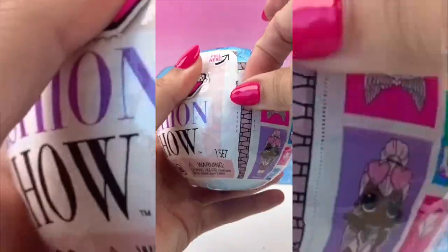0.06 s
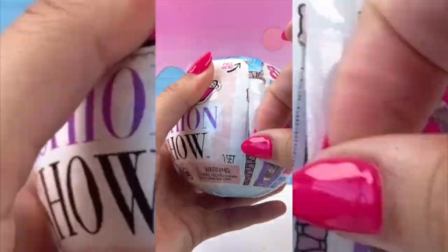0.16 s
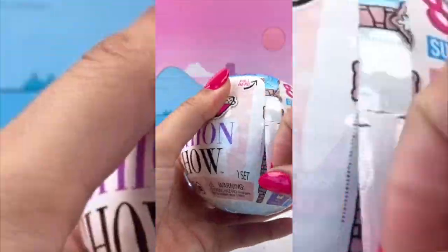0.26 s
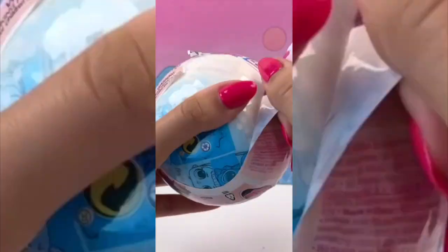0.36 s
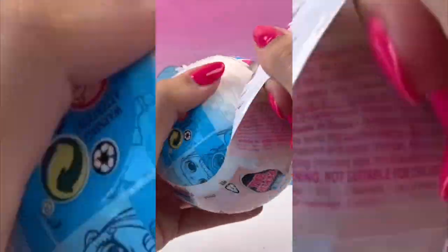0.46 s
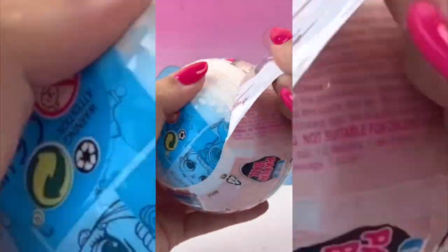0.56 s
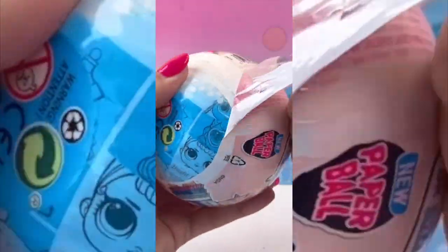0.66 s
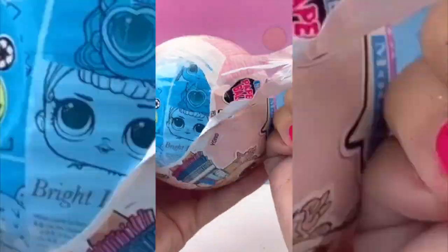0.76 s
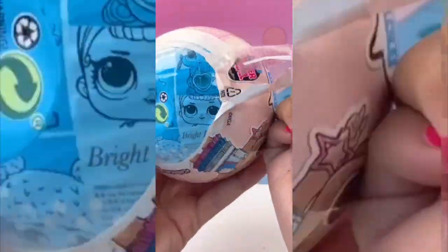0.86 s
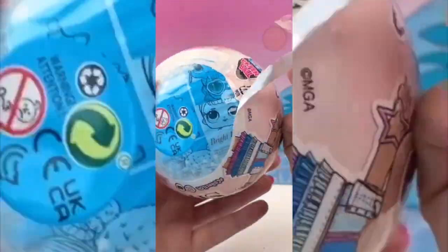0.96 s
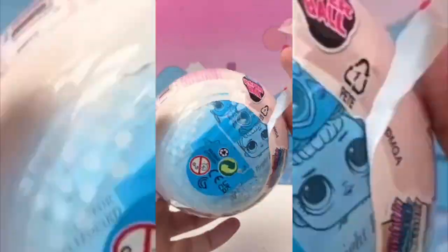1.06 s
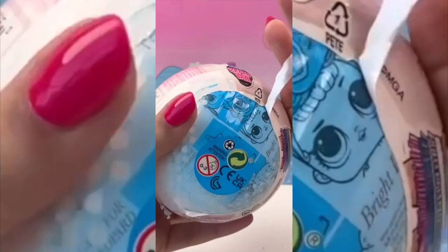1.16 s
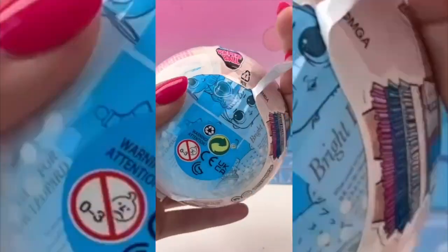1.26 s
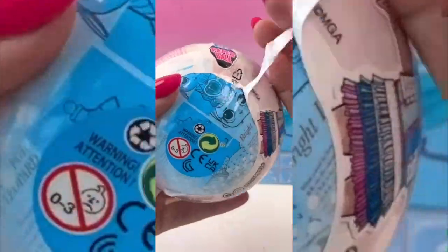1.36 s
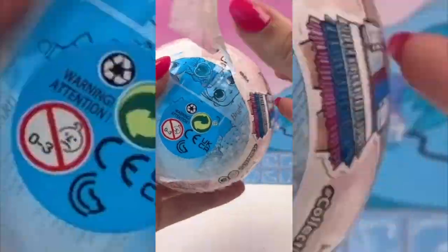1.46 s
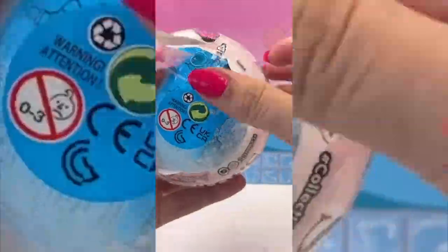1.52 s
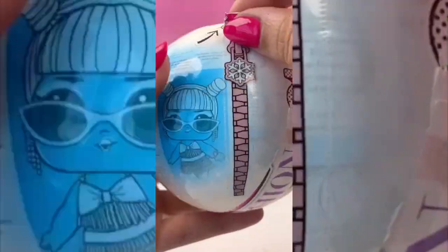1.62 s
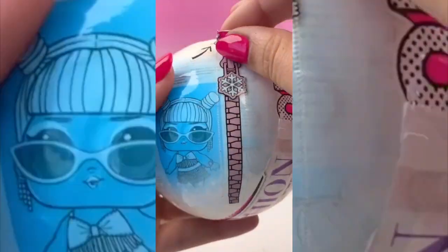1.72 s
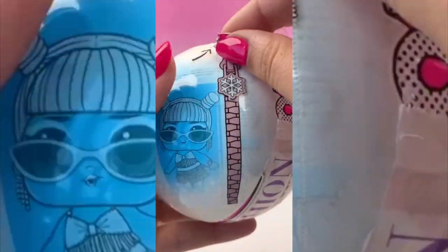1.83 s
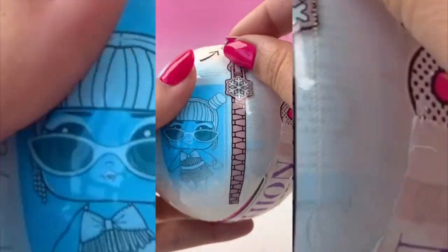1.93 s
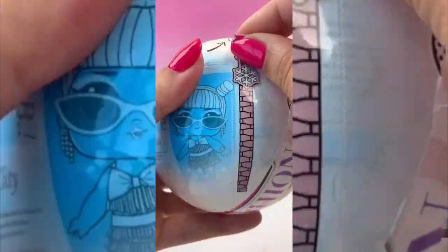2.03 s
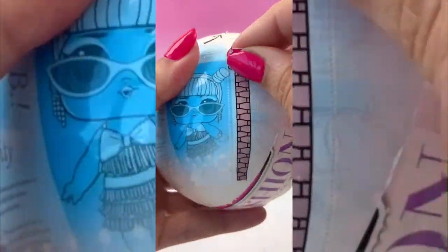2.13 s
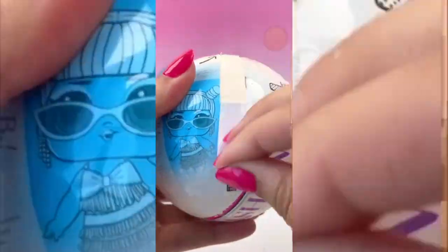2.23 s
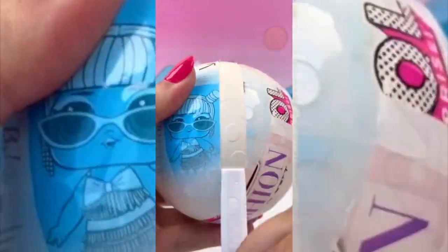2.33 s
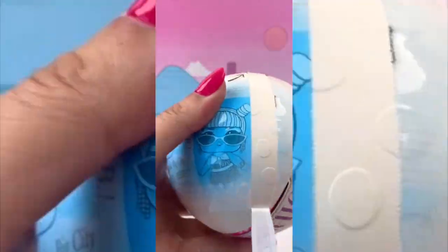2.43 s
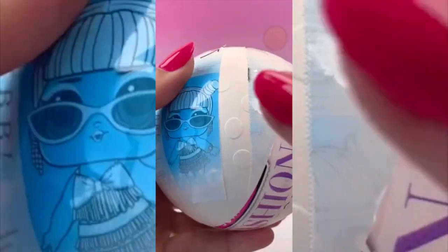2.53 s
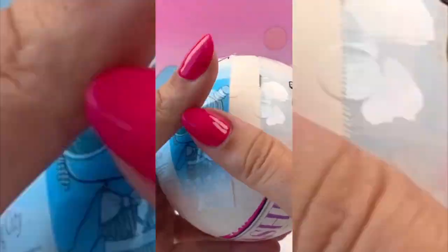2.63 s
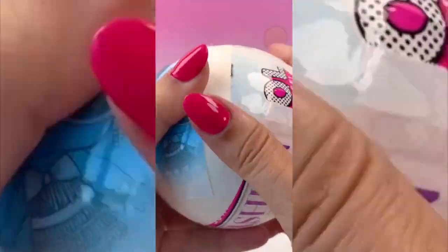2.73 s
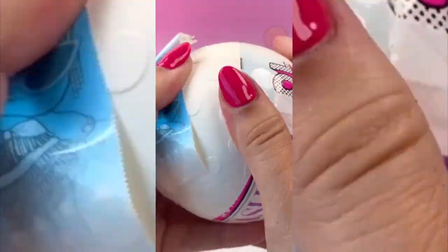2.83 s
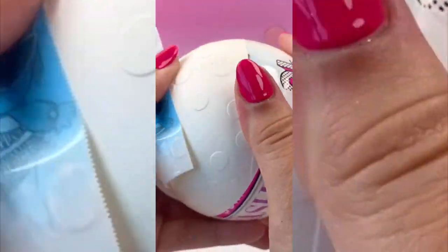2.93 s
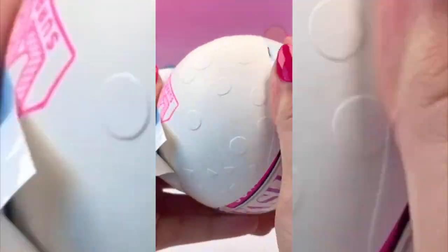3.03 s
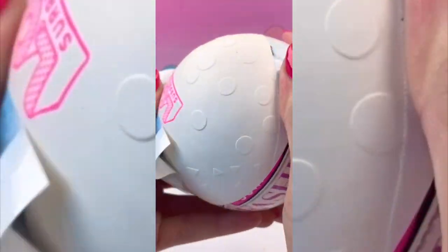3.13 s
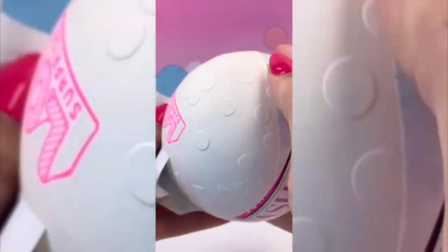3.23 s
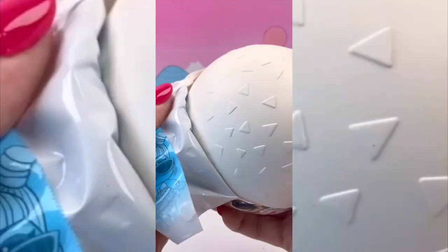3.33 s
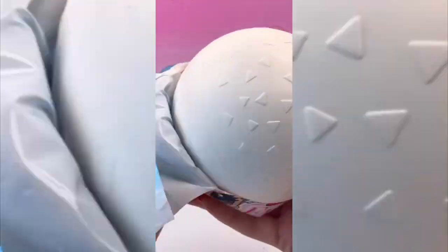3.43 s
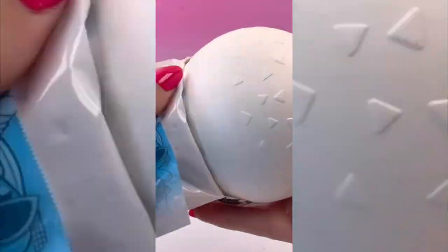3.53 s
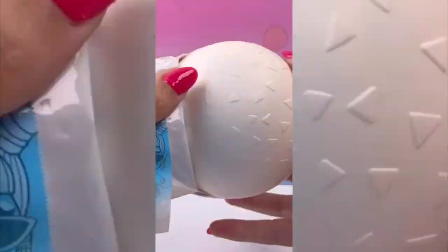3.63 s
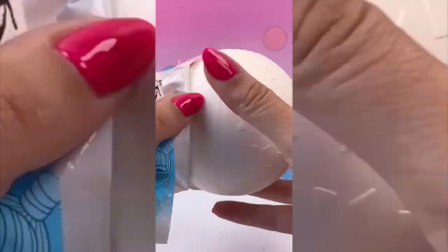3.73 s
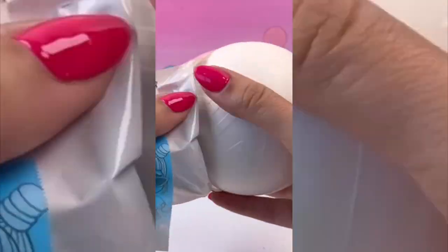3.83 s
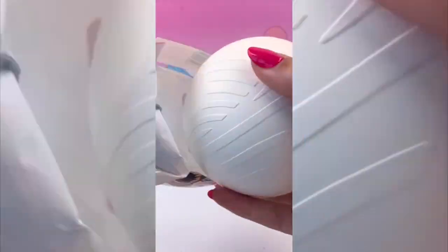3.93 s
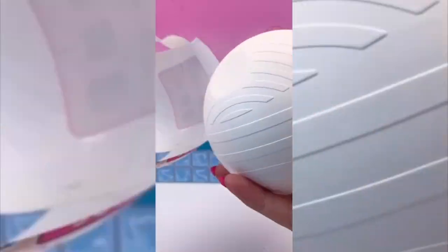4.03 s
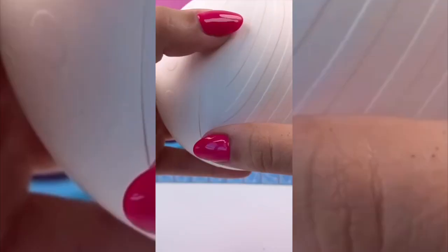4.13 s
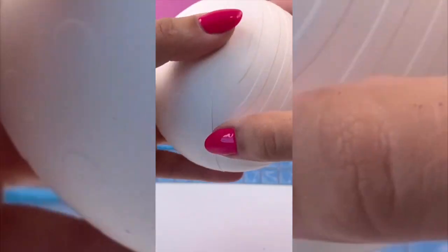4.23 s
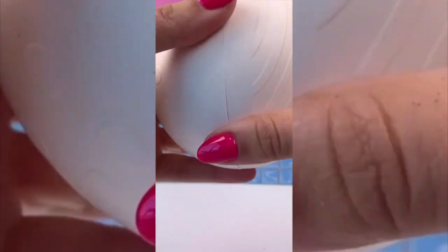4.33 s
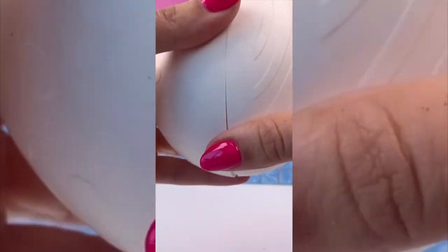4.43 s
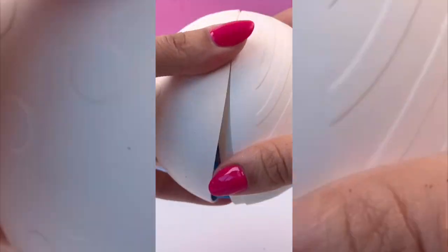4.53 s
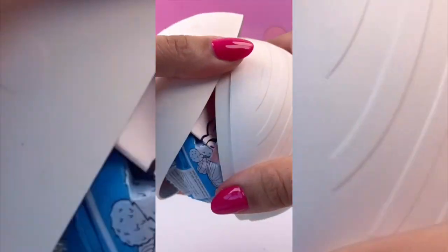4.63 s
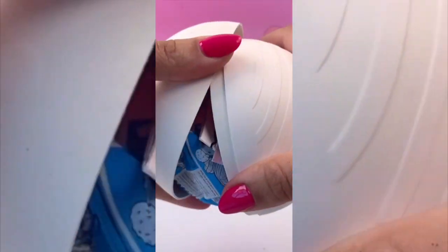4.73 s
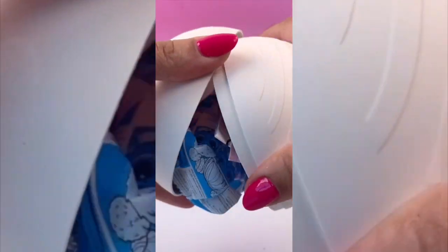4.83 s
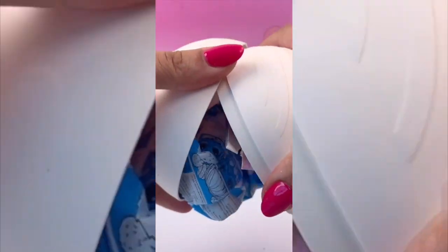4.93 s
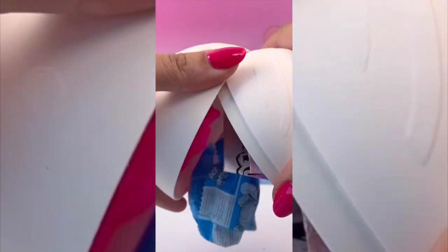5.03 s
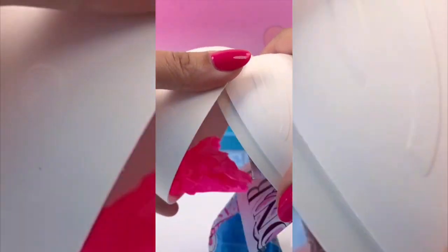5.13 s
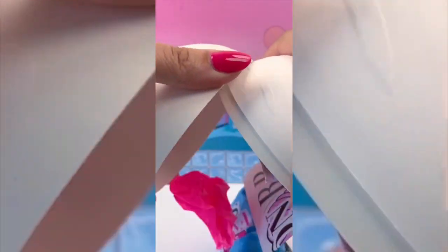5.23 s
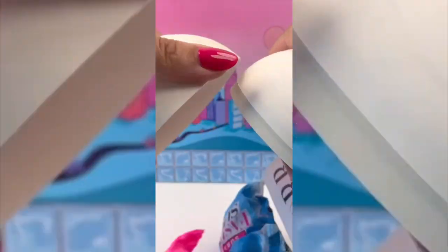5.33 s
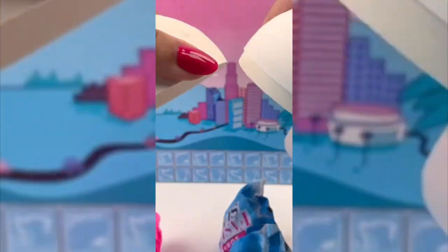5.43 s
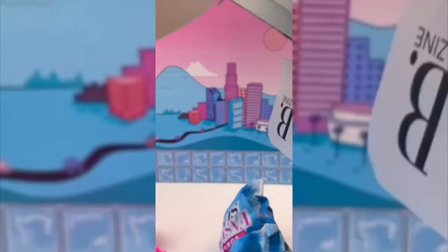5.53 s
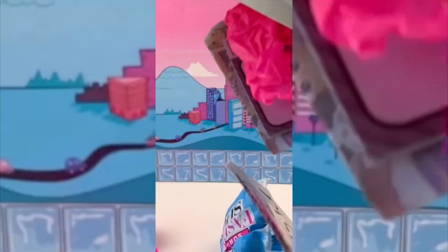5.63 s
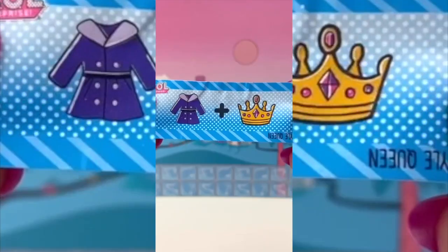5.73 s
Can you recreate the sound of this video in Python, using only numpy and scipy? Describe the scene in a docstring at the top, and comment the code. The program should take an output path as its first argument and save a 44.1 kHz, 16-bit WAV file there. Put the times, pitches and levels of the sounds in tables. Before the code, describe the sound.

Close crinkling and ripping of thin plastic wrap around a hollow ball, getting louder, followed by sparse plastic clicks and knocks.

```python
"""Plastic film rips, snaps and rustles close by, over dull thumps; near the end hollow clicks and knocks follow.
Hands peel the film off a hollow toy ball, then pry its two halves apart, in a small quiet room.
Film and shell are noise, coloured by their resonances and shaped by many tiny kicks or by hand strokes.
Thumps are short dull pulses; the seam is noise in a moving band; its hard pops also ring the shell in sines.
Table and wall echoes and a low murmur are added, and two microphone ports pick it all up in stereo."""
import sys
import numpy as np
from scipy import signal
from scipy.fft import rfft, irfft, next_fast_len
from scipy.io import wavfile
from scipy.ndimage import uniform_filter1d, map_coordinates

SR = 44100
rng = np.random.default_rng(int(sys.argv[2]) if len(sys.argv) > 2 else 0)


def wav_out(sig):
    """Save sig, one row per channel (or a flat mono array), as 16-bit PCM at SR to the path in sys.argv[1]."""
    wavfile.write(sys.argv[1], SR, np.round(np.clip(np.atleast_2d(sig).T, -1, 1) * 32767).astype(np.int16))


N = 254324

# Resonances of the hollow shell, the loose film, the taut film and the film's finest creases:
# (frequency [Hz], relative level [dB])
SHELL_COLOUR = [(150, -39.5), (330, -1.5), (500, -2), (650, 3.5), (790, 3), (950, -0.5), (1300, -0.5),
                (1650, -2.5), (2500, 0)]
LOOSE_COLOUR = [(900, -42.5), (1500, -12.5), (2000, -5.5), (2700, 1), (4000, -1), (5000, -1), (6400, -0.5),
                (7100, -0.5), (8500, -6.5)]
TAUT_COLOUR = [(900, -46.5), (1550, -24), (2100, -6), (3100, -2.5), (4100, -3), (5200, -0.5), (6500, 1.5),
               (7200, -9), (8500, -2)]
FIZZ_COLOUR = [(5500, -26), (7000, 3), (9000, 0.5), (11000, 3.5), (13500, 2.5), (15300, 5), (16200, -15.5),
               (17000, -31.5)]
# The film goes from stretched on the ball to hanging loose: (time [s], slack [0-1])
FILM_SLACK = [(2.4, 0.1), (2.75, 0.96)]
TICK_T60 = .011  # seconds for one tiny crease or torn bridge to die away by 60 dB
LEAD_S = .002  # seconds of silence ahead of each buckle


def amp(db):
    """Turn decibels into a plain gain."""
    return 10 ** (np.asarray(db) / 20)


def unit(x):
    """Scale x to an average strength (rms) of 1."""
    return x / np.sqrt(np.mean(x ** 2) + 1e-20)


def along(points, hz):
    """Read a (frequency, value) table on a log frequency axis."""
    f, v = np.transpose(points)
    return np.interp(np.log(hz + 1), np.log(f + 1), v)


def colour(points, hz):
    """Gain of a resonance table: it falls off above its last point and is cut well below its first."""
    gain = amp(along(points, hz)) / (1 + (hz / points[-1][0]) ** 8)
    return gain * (hz > points[0][0] / 2)


def filtered(x, response):
    """Pass x through a gain (and phase) that depends on frequency."""
    n = x.shape[-1]
    m = next_fast_len(n + 2048)
    return irfft(rfft(x, m) * response(np.fft.rfftfreq(m, 1 / SR)), m)[..., :n]


def curves(rows):
    """Draw each column after the time as a line with one value per sample."""
    s, *cols = np.transpose(rows)
    return [np.interp(np.arange(N) / SR, s, c) for c in cols]


def by_slack(pair, s):
    """Read a (taut film, loose film) pair at time s."""
    return np.interp(s, [FILM_SLACK[0][0], FILM_SLACK[-1][0]], pair)


def add(track, s, sound):
    """Mix a sound in at time s."""
    part = track[max(round(s * SR), 0):][:len(sound)]
    part += sound[:len(part)]


def at_level(x, db):
    """Scale a short sound so that its energy, spread over 10 ms, has the given level."""
    window_s = .01
    return x * amp(db) * np.sqrt(window_s * SR / (np.sum(x ** 2) + 1e-20))


def wobble(rate):
    """A smooth random curve with rate knots a second."""
    knots = rng.standard_normal(int(N * rate / SR) + 4)
    return map_coordinates(knots, [np.arange(N) * rate / SR], order=2)


def stroke(s, length, dying, db, attack):
    """One movement of the hand: it swells, holds for its length and dies away by 60 dB."""
    t = np.arange(N) / SR - s
    return amp(db - 60 * np.maximum(t - length, 0) / dying) * np.clip(t / attack, 0, 1)


def strokes(rows):
    """Overlapping movements add in power."""
    return np.sqrt(sum(stroke(*row, attack=0.007) ** 2 for row in rows))


def ringing(kicks, t60):
    """Envelope of a crumpled sheet: every kick adds energy that dies away."""
    keep = amp(-120 / (t60 * SR))  # share of the energy left after one sample
    energy = signal.lfilter([1], [1, -keep], kicks ** 2)
    return np.sqrt(np.abs(energy))


def crackle(envelope, spectrum):
    """Countless modes sound together: noise under an envelope, coloured by a table, at rms 1."""
    noise = envelope * rng.standard_normal(N)
    return unit(filtered(noise, lambda hz: colour(spectrum, hz)))


def shifting(x):
    """The vibrating patch of film keeps changing shape, so its resonances come and go."""
    z = signal.stft(x, nperseg=256)[2]
    field = uniform_filter1d(rng.standard_normal(z.shape), 3, 0)  # smooth over frequency
    field = uniform_filter1d(field, 7, 1)  # smooth over time
    return unit(signal.istft(z * amp(3.5 * unit(field)), nperseg=256)[1][:N])


def film(envelope):
    """The sheet's own ring, high while taut and lower once loose."""
    slack = curves(FILM_SLACK)[0]
    taut = np.sqrt(1 - slack) * crackle(envelope, TAUT_COLOUR)
    return taut + np.sqrt(slack) * crackle(envelope, LOOSE_COLOUR)


def room_tone(level_db=-56, side_db=-22):
    """A low steady murmur of the building, nearly alike at both ports."""
    # (frequency [Hz], relative level [dB])
    murmur_colour = [(20, -24), (70, -1), (250, -2), (380, -9), (600, -24), (1300, -42), (15000, -52)]
    mid = crackle(1, murmur_colour)
    side = amp(side_db) * crackle(1, murmur_colour)
    return amp(level_db) * np.array([mid + side, mid - side])


def rips(jitter=0.18, scatter_db=1.5, attack_s=0.0039):
    """The bridges of the perforation break one after another, and each tugs at the ball."""
    # Pulls on the perforation; the last three levels are relative to the level column:
    # (time [s], length [s], dying away [s], level [dB], brightness [dB], shell [dB],
    #  tug on the ball [dB], rate [bridges/s])
    pulls = [(0.025, 0.067, 0.12, -32, 3, -7.5, -6.5, 430),
             (0.182, .014, 0.043, -33.5, 2.5, -2.5, -0.5, 310), (0.245, 0.021, .07, -37, 3, -3, -1, 450),
             (2.006, 0.01, 0.31, -30, 7.5, -6.5, -4.5, 130), (2.082, 0.13, 0.13, -36, 7.5, -8.5, -2, 430),
             (2.223, 0.071, 0.12, -37, 9, -6, -22, 490), (2.357, 0.046, 0.053, -41, 8, -10, -32.5, 920),
             (3.359, .04, 0.083, -18, -4, -14, -31, 380)]
    # Dull sound of a tug on the ball: (frequency [Hz], relative level [dB])
    tug_colour = [(25, -20), (50, -43), (80, -2.5), (160, 2), (300, -4), (500, -5.5), (1000, -46.5)]
    power = np.zeros((4, N))
    for s, length, dying, db, bright_db, shell_db, tug_db, rate in pulls:
        slips = np.arange(s, s + length + dying, 1 / rate)
        early, size = rng.standard_normal((1000, 2))[:len(slips)].T
        at = np.clip((slips + jitter * early / rate) * SR, 0, N - 1).astype(int)
        ticks = ringing(np.bincount(at, amp(scatter_db * size), N), TICK_T60)
        duty = (length + dying) * SR / N  # share of the whole time spent on this pull
        pull = unit(ticks) * stroke(s, length, dying, db, attack_s)
        layer_gains = amp([tug_db, shell_db, 0, bright_db])
        power += duty * np.outer(layer_gains, pull) ** 2
    tug, shell, sheet, fizz = np.sqrt(power)
    layers = [crackle(tug, tug_colour), crackle(shell, SHELL_COLOUR),
              shifting(film(sheet)), crackle(fizz, FIZZ_COLOUR)]
    return np.sqrt(power.mean(axis=1)) @ np.array(layers)  # give each layer its strength back


def creases(rate, hiss, spread_db):
    """Envelope of tiny creases that tick at random over the soft hiss of sliding film."""
    sizes = amp(spread_db * np.minimum(rng.exponential(size=N), 3.5))
    kicks = (rng.random(N) < rate / SR) * sizes
    return np.hypot(unit(ringing(kicks, TICK_T60)), hiss)


def voiced(envelope, rows, shell_db, sheet_db):
    """The same strokes sound shell, sheet and fizz; the shell's share depends on how taut the film is."""
    level = strokes([row[:-1] for row in rows])
    fizz_level = strokes([(s, length, dying, db + bright_db) for s, length, dying, db, bright_db in rows])
    shell = crackle(envelope, SHELL_COLOUR)
    sheet = shifting(film(envelope))
    fizz = crackle(envelope, FIZZ_COLOUR)
    shell_gain = amp(by_slack(shell_db, np.arange(N) / SR))
    return level * (shell_gain * shell + amp(sheet_db) * sheet) + fizz_level * fizz


def rustle():
    """A crumpled flap ticks and sounds mostly by itself; a rub is smoother and sounds the shell more."""
    # Fingertips slide over the ball; sheet and shell gains come on top of the level, brightness is
    # the fizz relative to it:
    # (time [s], length [s], dying away [s], level [dB], brightness [dB])
    rub_rows = [(0.113, 0.16, 0.92, -51.5, 0.5), (0.906, 0.22, 0.44, -55.5, -1),
                (1.295, 0.087, 0.33, -51.5, -1), (1.483, 0.096, .05, -63, -1), (1.621, 0.055, .6, -77.5, 1),
                (1.813, 0.036, 0.18, -65.5, 3.5), (1.906, 0.12, 0.078, -56.5, -4.5),
                (2.325, 0.17, 0.15, -54.5, 0), (2.566, 0.018, 0.58, -61.5, 4.5), (2.681, 0.048, .2, -51, 1),
                (3.984, 0.023, 0.065, -38, -9), (4.144, 0.11, 0.39, -67, 5), (4.37, 0.3, 0.15, -51, -10),
                (4.498, 0.052, 0.29, -39, -1.5), (4.604, 0.31, 0.35, -53, -2),
                (4.965, 0.045, 0.15, -45.5, -4.5), (5.052, 0.076, 0.3, -40, -7),
                (5.244, 0.41, .2, -61, -1.5), (5.496, 0.13, 0.3, -52, 0.5),
                (5.661, 0.026, 0.15, -40.5, -1.5)]
    # A loose flap is crumpled, same columns:
    # (time [s], length [s], dying away [s], level [dB], brightness [dB])
    crumple_rows = [(0.384, .03, 0.32, -36.5, -5), (0.449, 0.12, .15, -43.5, -3),
                    (0.581, 0.054, 0.18, -45, 4.5), (0.652, 0.02, .5, -38.5, -4.5),
                    (0.784, 0.059, 0.31, -46, -1), (2.758, .21, 0.95, -39, -7.5),
                    (3.062, 0.019, 0.23, -38.5, -12), (3.236, 0.22, 0.54, -42, -16),
                    (3.453, 0.041, 0.42, -28.5, -7.5), (3.599, 0.18, 0.45, -43, -7),
                    (3.742, 0.11, 0.71, -32, -12), (3.909, 0.016, 0.31, -38, -10.5),
                    (4.052, 0.067, 0.012, -44, -14)]
    # shell_db: (film taut, film loose)
    crumple_ticks = creases(rate=480, hiss=0.77, spread_db=5)
    crumple = voiced(crumple_ticks, crumple_rows, shell_db=(-14.5, -12.5), sheet_db=0.0)
    rub_ticks = creases(rate=560, hiss=0.95, spread_db=5.5)
    rub = voiced(rub_ticks, rub_rows, shell_db=(-7, -2.5), sheet_db=-0.5)
    return crumple + rub


def buckle(length, sheet, fold_hz, shell_db, crack_db, fizz_db, t60=0.014, fizz_t60=0.01,
           follow_rate=900, scatter_db=5, last=0.92, fold_db=11, fold_width=0.067):
    """A crease gives way in a short avalanche of buckles; the freed fold rings at its own pitch."""
    n, lead = SR // 20, round(LEAD_S * SR)
    t = (np.arange(n) - lead) / SR
    kicks = (rng.random(n) < follow_rate / SR) * (t > 0) * (t < length)
    kicks = kicks * amp(scatter_db * rng.standard_normal(n))
    kicks[lead] = 1  # the avalanche has a firm start and a firm end
    kicks[lead + int(np.clip(length * SR, 1, n // 2))] = last
    burst = ringing(kicks, t60) * rng.standard_normal(n)

    def fold(hz):
        return amp(fold_db / (1 + ((hz / fold_hz - 1) / fold_width) ** 2))

    snap = at_level(filtered(burst, lambda hz: colour(SHELL_COLOUR, hz)), shell_db)
    snap += at_level(filtered(burst, lambda hz: colour(sheet, hz) * fold(hz)), crack_db)
    spark = ringing(kicks, fizz_t60) * rng.standard_normal(n)  # the finest creases die first
    return snap + at_level(filtered(spark, lambda hz: colour(FIZZ_COLOUR, hz)), fizz_db)


def snaps():
    """Single loud buckles; taut film passes more of each one to the shell."""
    # Buckles of the film; brightness is the fizz relative to the level:
    # (time [s], length [s], fold resonance [Hz], level [dB], brightness [dB])
    buckle_rows = [(0.122, .002, 6800, -36.5, 5), (0.149, 0.00028, 7200, -34, 1),
                   (0.2347, 0.00052, 2700, -36, 1.5), (0.391, .003, 4100, -34, 2),
                   (0.4004, 0.0026, 5600, -22.5, 1.5), (0.4221, 0.00087, 5500, -33, 4.5),
                   (0.451, 0.00055, 3130, -44, -9), (0.502, 0.0016, 3160, -32, 2),
                   (0.544, 0.0003, 2860, -35.5, 0.5), (0.6137, 0.0035, 7000, -43.5, 15.5),
                   (0.633, .0003, 7000, -47.5, 15), (0.6664, 0.0039, 3100, -26, 3.5),
                   (0.915, 0.00057, 7100, -39.5, 10.5), (1.014, 0.00015, 5200, -36.5, 6),
                   (1.3613, 0.00062, 2580, -42.5, 4), (1.3976, .0004, 7700, -41, 2),
                   (1.502, 0.005, 7160, -44, -4), (1.9145, 0.00036, 6000, -35.5, 5.5),
                   (1.9296, .0002, 6300, -33, 2), (1.938, 0.00014, 6310, -31, 1),
                   (1.955, 0.00067, 6270, -29, -1), (2.0056, 0.0023, 6200, -26.5, -1),
                   (2.404, 0.0067, 6540, -33.5, 5.5), (2.4853, .0012, 5900, -47, 7.5),
                   (2.7384, 0.00015, 2050, -29, -8), (2.7668, .003, 5920, -21.5, -1.5),
                   (2.783, 0.00027, 5400, -26, 3.5), (2.829, 0.0027, 2550, -18.5, -2.5),
                   (2.842, 0.00039, 6640, -24, -7), (2.858, .0004, 3540, -29, -9),
                   (2.927, .0002, 5400, -33, -14.5), (2.9468, 0.002, 6400, -24.5, -4.5),
                   (3.0808, .001, 5940, -30, -1), (3.0939, 0.0031, 5800, -19.5, 0.5),
                   (3.116, 0.001, 5900, -22, -2.5), (3.2298, .0022, 3424, -30, -2),
                   (3.269, 0.00059, 3300, -41, 5), (3.2883, .0006, 6450, -36, 6.5),
                   (3.314, 0.0051, 2680, -18.5, -8), (3.44, 0.00049, 3630, -25.5, -0.5),
                   (3.47, 0.0089, 3650, -24, -3), (3.522, 0.00037, 2460, -24.5, -4),
                   (3.5387, .0066, 3500, -23, -2), (3.621, 0.00051, 2520, -34, -3),
                   (3.6313, .0004, 2310, -36.5, -1), (3.654, .001, 2700, -33, -14.5),
                   (3.706, .0004, 3470, -36.5, -4), (3.7283, 0.015, 5850, -23.5, -1),
                   (3.771, .0052, 6440, -27, -3), (3.806, 0.0047, 1950, -21.5, 3.5),
                   (3.85, .0002, 3500, -25.5, -5.5), (3.901, 0.0014, 4400, -26, -7.5),
                   (3.918, .005, 2250, -29, -7.5), (3.941, 0.00077, 6600, -29, -4.5),
                   (3.966, 0.00033, 5550, -37.5, 0), (4.017, 0.0014, 5900, -27, -4),
                   (4.059, 0.0044, 3880, -28, -8.5), (4.106, 0.0013, 5700, -37, -38)]
    shell_share_db = (-12.5, -14.5)  # (film taut, film loose)
    out = np.zeros(N)
    for s, length, fold_hz, db, bright_db in buckle_rows:
        sheet = TAUT_COLOUR if s < FILM_SLACK[-1][0] else LOOSE_COLOUR
        shell_db = db + by_slack(shell_share_db, s)
        add(out, s - LEAD_S, buckle(length, sheet, fold_hz, shell_db, db, db + bright_db))
    return out


def thumps(boom_db=-7, boom_t60=0.26, boom_hz=140, lowest_hz=56):
    """Each jolt is one dull push of air; once the ball is open, its cavity booms on."""
    # Jolts of the ball, from a soft grip to film slapping the shell:
    # (time [s], level [dB], centre frequency [Hz])
    jolts = [(0.122, -42, 500), (0.149, -37.5, 411), (0.212, -35.5, 404), (0.235, -37, 550),
             (0.267, -37, 450), (0.665, -24, 285), (0.673, -27, 81), (1.956, -40, 187),
             (2.006, -35.5, 169.5), (2.231, -40, 85), (2.591, -37.5, 100), (2.739, -36, 800),
             (2.828, -29.5, 600), (2.95, -24.5, 217), (2.952, -30.5, 85), (3.095, -41.5, 550),
             (3.117, -41, 200), (3.232, -36.5, 464), (3.317, -36.5, 355), (3.541, -32.5, 600),
             (4.378, -37, 179), (4.485, -30.5, 148), (5.061, -18.5, 170), (5.08, -27.5, 150.3),
             (5.117, -37.5, 154), (5.648, -30.5, 165)]
    open_s = 5.05  # time at which the halves part
    out, n = np.zeros(N), SR // 10
    fade = amp(-60 * np.arange(SR // 2) / SR / boom_t60)
    for s, db, centre_hz in jolts:
        def dull(hz):
            hump = (hz / centre_hz) ** 2 / (1 + (hz / centre_hz) ** 4.2)
            low_cut = hz ** 3 / (hz ** 3 + lowest_hz ** 3)
            return hump * low_cut / (1 + (hz / 1200) ** 8)

        push = filtered(signal.unit_impulse(n, n // 2), dull)
        add(out, s - n / 2 / SR, at_level(push, db))
        if s > open_s:
            noise = rng.standard_normal(len(fade))
            boom = fade * filtered(noise, lambda hz: 1 / (1 + ((hz - boom_hz) / 35) ** 4))
            add(out, s, at_level(boom, db + boom_db))
    return out


def grip():
    """Skin drags on the ball with a low rumble as it rolls in the palm."""
    # (time [s], length [s], dying away [s], level [dB])
    rolls = [(0.4, 0.24, .5, -51.5), (0.74, 0.17, 1.2, -48), (1.75, .48, 0.16, -48.5),
             (2.55, .57, 0.16, -52.5), (3.68, 0.06, 0.36, -43)]
    # (frequency [Hz], relative level [dB])
    palm_colour = [(30, -24.5), (55, 1), (90, 1), (200, -10.5)]
    return strokes(rolls) * crackle(1, palm_colour)


def seam():
    """Plastic sticks and slips on plastic; the opening cavity picks out a moving band."""
    # The halves rub along their seam; the resonance also wavers at random around this line:
    # (time [s], level [dB], resonance [Hz])
    rub_line = [(4.49, -41.5, 782.5), (4.55, -47.5, 860), (4.66, -52, 953), (4.8, -51, 867),
                (4.92, -54, 723), (5.03, -45.5, 585), (5.06, -74, 582)]
    db, hz = curves(rub_line)
    rub = filtered(rng.standard_normal((2, N)), lambda f: 1 / (1 + (f / 210) ** 2))
    # low noise is carried up to the wavering resonance
    turn = 2 * np.pi * np.cumsum(hz * (1 + .1 * wobble(25))) / SR
    band = rub[0] * np.cos(turn) + rub[1] * np.sin(turn)
    slips = amp(4 * wobble(70))
    t = np.arange(N) / SR
    rubbing = (t > rub_line[0][0]) * (t < rub_line[-1][0])
    return amp(db) * unit(slips * band) * rubbing


def pops(length_s=0.0066, fold_hz=2160, fizz_db=0.5):
    """Each slip of the seam clicks and knocks; the hard ones ring the shell briefly."""
    # The halves catch and spring at their seam: (time [s], click level [dB], hollow knock level [dB])
    slips = [(4.5242, -30.5, -33), (4.623, -40.5, -46), (4.893, -46, -69), (4.947, -44.5, -42),
             (5.0003, -45, -48), (5.0596, -33.5, -32.5), (5.1188, -42.5, -41), (5.2433, -39.5, -47.5),
             (5.302, -43, -69), (5.366, -49.5, -79), (5.416, -45, -66.5), (5.579, -33.5, -39.5),
             (5.650, -37.5, -42), (5.677, -38.5, -48)]
    # Ringing tones of the shell: (frequency [Hz], relative level [dB], time to fall by 60 dB [s])
    shell_modes = [(380, -27, 0.022), (807, 6.5, 0.062), (1025, -12, 0.079), (2150, -15, 0.017),
                   (2212, 3.5, 0.012)]
    # a knock of hard_knock_db rings at ring_db; the ring grows faster than the knock
    hard_knock_db, ring_db, ring_grows = -32, -20.5, 3.3
    out, t = np.zeros(N), np.arange(SR // 2) / SR
    for s, click_db, knock_db in slips:
        ring = np.zeros(len(t))
        for hz, level, t60 in shell_modes:
            mode_db = level + rng.normal(0, 0.28)  # no two knocks ring quite alike
            ring += amp(mode_db - 60 * t / t60) * np.sin(2 * np.pi * hz * t)
        add(out, s, amp(ring_db + ring_grows * (knock_db - hard_knock_db)) * ring)
        click = buckle(length_s, LOOSE_COLOUR, fold_hz, knock_db, click_db, click_db + fizz_db)
        add(out, s - LEAD_S, click)
    return out


def spread(x):
    """Each crease lies at its own place, so it reaches one port a little before the other."""
    side = filtered(x * wobble(200), lambda hz: .27j * hz / (hz + 500))
    return np.array([x + side, x - side])


def room(x, wet_db=-17, table_db=-16, table_t60=.035):
    """The table scatters the sound almost at once; the walls add a faint tail."""
    # How long the walls' tail takes to fall by 60 dB: (frequency [Hz], time [s])
    wall_t60 = [(150, 0.3), (5000, 0.097), (15000, 0.32)]
    hz, t, z = signal.stft(rng.standard_normal((2, SR // 2)), SR, nperseg=256)
    decay = amp(-60 * t / along(wall_t60, hz)[:, None])
    tail = signal.istft(z * decay, SR, nperseg=256)[1]
    table_decay = amp(-60 * np.arange(tail.shape[1]) / SR / table_t60)
    near = rng.standard_normal(tail.shape) * table_decay
    answer = amp(wet_db) * tail / np.linalg.norm(tail[0])
    answer += amp(table_db) * near / np.linalg.norm(near[0])
    # long waves reach both ports alike
    side = filtered(answer[1], lambda hz: hz / (hz + 300))
    echoes = np.array([answer[0] + side, answer[0] - side])
    delayed = np.pad(x, (SR // 500, 0))[None]  # 2 ms later than the direct sound
    return signal.fftconvolve(delayed, echoes, axes=1)[:, :N]


def scene():
    """Everything the hands do, heard directly and through the room, over its murmur."""
    hands = snaps() + rips() + rustle() + thumps() + grip() + seam() + pops()
    return spread(hands) + room(hands) + room_tone()


def record(dry, bass_lag_cycles=1.15, top_hz=16700):
    """The ports drift out of phase in the treble; the bass arrives late, so each thump sweeps downward."""
    # Phase by which the left port leads the right: (frequency [Hz], phase [radians])
    port_phase = [(100, 0), (1200, -.1), (3000, .2), (6200, .3), (7000, 1.2), (8000, 2.7), (9500, 3.5),
                  (11500, 5.7), (13300, 6.6), (15500, 9.1)]

    def ports(hz):
        return np.exp(.5j * along(port_phase, hz) * np.array([[1], [-1]]))

    def lag(hz):
        return np.exp(-2j * np.pi * bass_lag_cycles * (np.log(hz + 20) - hz / 4000))

    # silence at both ends, with short fades
    running = np.interp(np.arange(N) / SR, [.025, .031, 5.688, 5.705], [0, 1, 1, 0])
    heard = filtered(dry, lambda hz: ports(hz) * lag(hz)) * running
    return filtered(heard, lambda hz: hz < top_hz)


dry = scene()
out = record(dry)
wav_out(out)
```